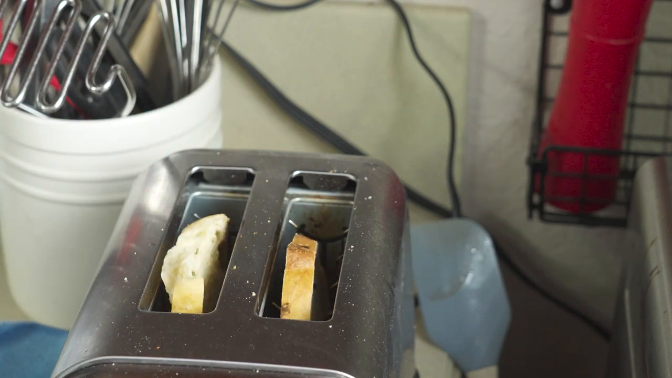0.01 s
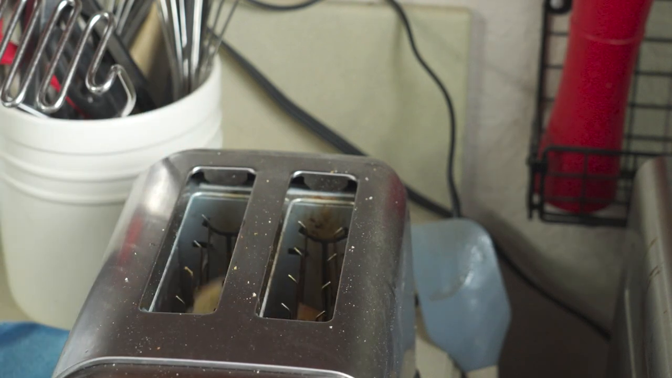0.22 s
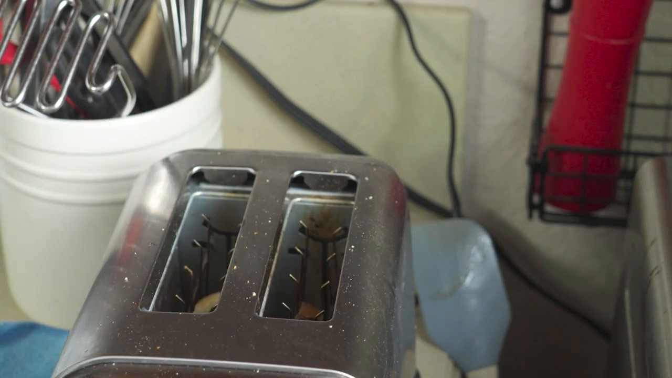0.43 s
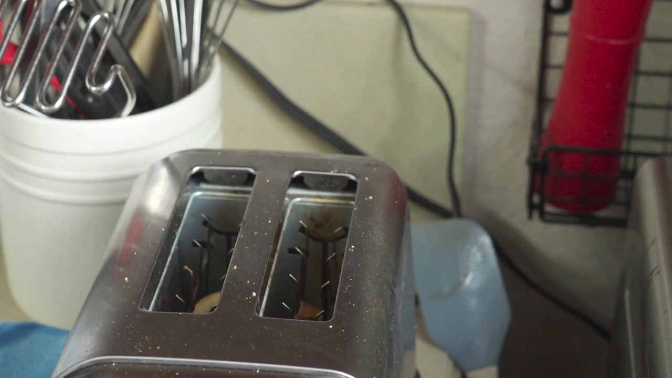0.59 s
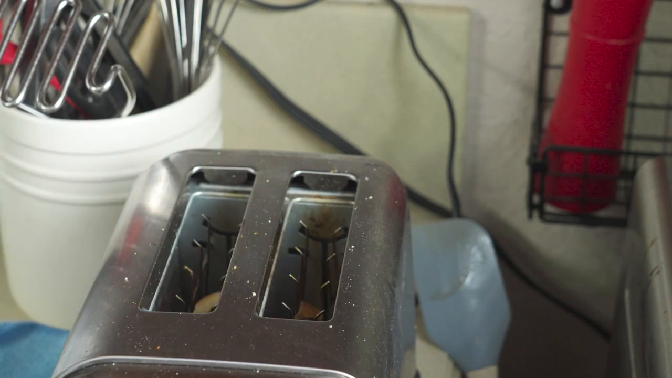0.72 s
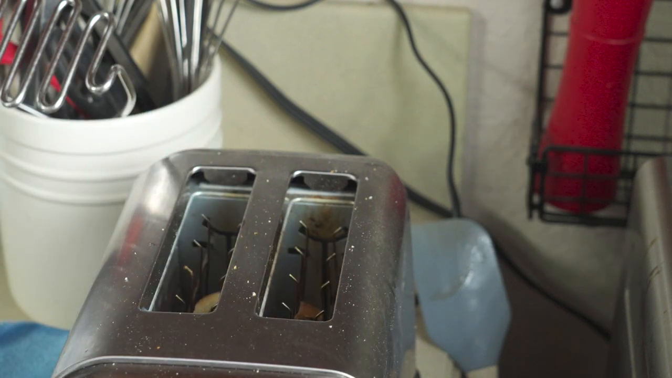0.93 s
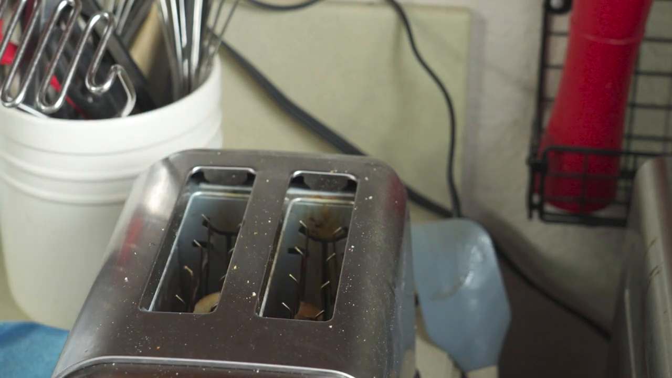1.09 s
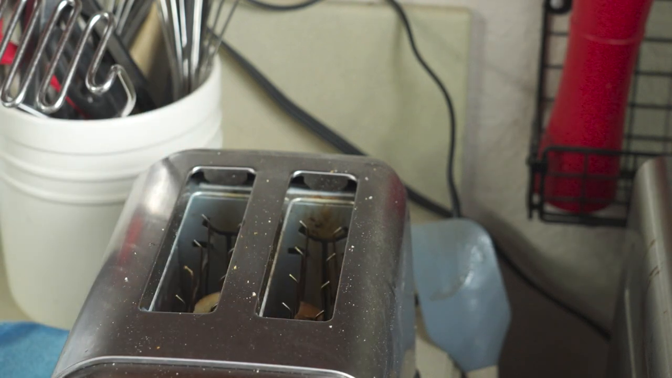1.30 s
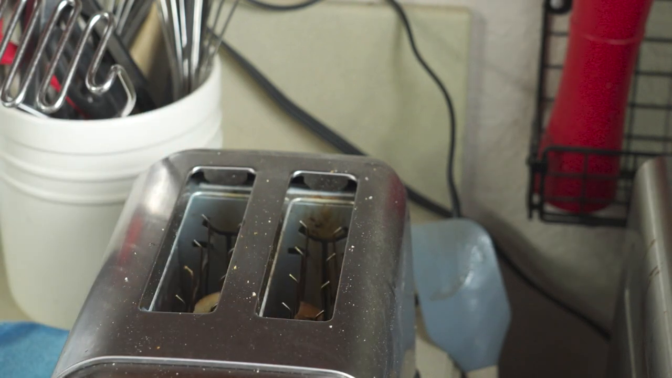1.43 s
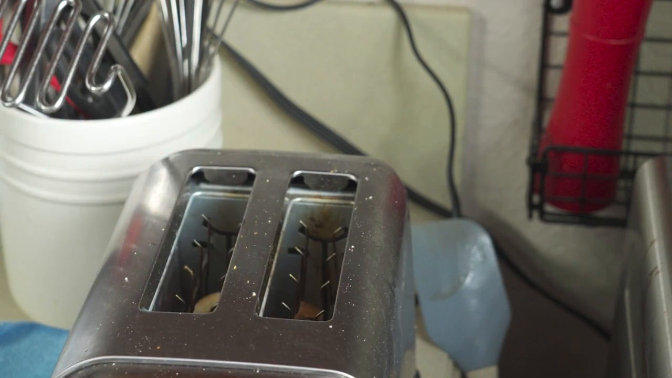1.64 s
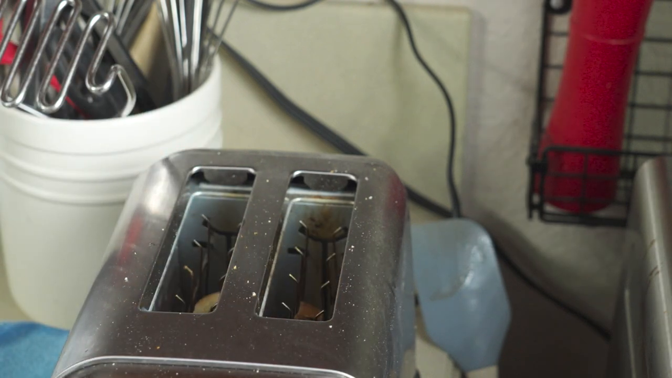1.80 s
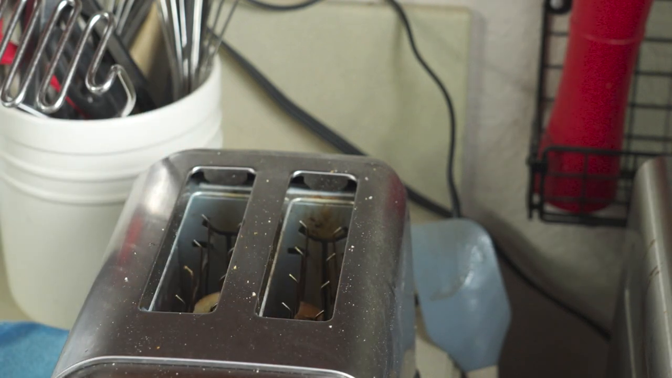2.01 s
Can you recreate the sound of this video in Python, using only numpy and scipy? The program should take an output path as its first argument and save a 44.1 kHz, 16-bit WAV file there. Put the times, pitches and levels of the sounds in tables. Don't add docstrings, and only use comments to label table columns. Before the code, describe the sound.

Toaster lever pushed down: quick scrape, loud metal clunk, brief rattle, then soft knocks and faint ticking

```python
import sys
import numpy as np
from scipy import signal
from scipy.fft import rfft, irfft
from scipy.io import wavfile

SR = 44100
rng = np.random.default_rng(int(sys.argv[2]) if len(sys.argv) > 2 else 0)


def gain_from_db(level_db):
    decades = np.asarray(level_db, float) / 20
    return 10 ** decades


def master_out(mix):
    frames = np.transpose(np.atleast_2d(mix))
    ceiling = np.clip(frames, -1, 1)
    pcm = np.round(ceiling * 32767).astype(np.int16)
    wavfile.write(sys.argv[1], SR, pcm)


N = 90405


def rms_one(x):
    return x / np.sqrt(np.mean(x ** 2) + 1e-30)


def at_hz(points, hz):
    table_hz, value = np.transpose(points)
    return np.interp(np.log(hz), np.log(table_hz), value)


def highpass(x, order, hz):
    return signal.sosfilt(signal.butter(order, hz, "high", fs=SR, output="sos"), x)


def colour(x, spectrum, humps=()):
    size = 16384
    hz = np.maximum(np.arange(size // 2 + 1) * SR / size, 1)
    db = at_hz(spectrum, hz)
    for centre_hz, width_hz, hump_db in humps:
        db = db + hump_db * np.exp(-((hz - centre_hz) / width_hz * 2) ** 2)
    cepstrum = irfft(np.log(gain_from_db(db)))
    cepstrum[1:size // 2] *= 2
    cepstrum[size // 2 + 1:] = 0
    h = irfft(np.exp(rfft(cepstrum)))
    return signal.fftconvolve(x, h / np.sqrt(np.sum(h ** 2)))[:len(x)]


def ring(clicks, hz, t60_s):
    r = gain_from_db(-60 / (max(t60_s, .002) * SR))
    w = 2 * np.pi * hz / SR
    return signal.lfilter([0, np.sin(w)], [1, -2 * r * np.cos(w), r * r], clicks + 1e-18)


def ring_noise(drive, modes):
    out = np.zeros(N)
    for hz, level_db, t60_s in modes:
        out += gain_from_db(level_db) * ring(drive * rng.standard_normal(N), hz, t60_s)
    return out


def shorten(modes, share):
    return [(hz, level_db, t60_s * share) for hz, level_db, t60_s in modes]


def strike(start_s, db, modes, dull_hz, spread_db):
    out = np.zeros(N)
    luck = rng.normal(0, 1, (len(start_s), len(modes)))
    for k, (hz, level_db, t60_s) in enumerate(modes):
        force = gain_from_db(db + level_db + spread_db * luck[:, k]) / (1 + (hz / dull_hz) ** 2)
        clicks = np.zeros(N)
        clicks[(start_s * SR).astype(int)] = -force
        out += ring(clicks, hz, t60_s)
    return out


def grains(per_s, spread_db):
    size = gain_from_db(spread_db * np.minimum(rng.exponential(1, N), 4))
    return size * rng.choice([-1, 1], N) * (rng.random(N) < per_s / SR)


# hz, db_per_hz
HISS = [(300, -4), (700, -4.5), (2200, -4.5), (5400, -3.5), (7900, -7), (9000, -14.5), (12000, -11.5),
        (15700, -14)]
# hz, db_per_hz
RUMBLE = [(3, -1.5), (12, -10), (25, -39), (60, -25.5), (150, -35.5), (300, -38), (600, -61)]
# hz, width_hz, level_db
HUMPS = [(3380, 1600, 2.5), (5500, 1100, 2), (7780, 1730, 3.5), (6500, 440, -1.5), (10770, 1060, -8),
         (496, 16, 10.5), (138.8, 31, 18.5)]
HISS_DB, RUMBLE_DB = -59, -67


def floor():
    white = rng.standard_normal((2, N + SR))
    hiss = colour(white[0], [(25, -35)] + list(HISS), HUMPS[:6])[SR:]
    rumble = colour(white[1], RUMBLE, HUMPS[6:])[SR:]
    return gain_from_db(HISS_DB) * rms_one(hiss) + gain_from_db(RUMBLE_DB) * rms_one(rumble)


# start_s, level_db, pitch_hz, t60_s
THUMPS = [(0.0355, -45, 158, 0.1), (0.262, -36.5, 82.6, 0.34), (.246, -30.5, 150.2, 0.16),
          (.251, -31.5, 223, 0.35), (0.69, -67, 57, 0.49), (1.048, -63, 66, 0.18),
          (1.179, -59.5, 61.2, 0.33), (1.637, -52, 76, 0.084), (1.689, -59, 81, 0.15)]
# start_s, level_db, t60_s
SHUDDERS = [
    (-.01, -52, 0.9),
    (0.129, -62.5, 1),
    (.250, -31.5, 0.51),
    (.46, -57.5, 0.99),
]
# hz, db_per_hz
SHUDDER_COLOUR = [(25, -23), (60, -0.5), (120, 0), (280, -5), (500, -3.5), (900, -8), (2000, -10.5),
                  (5000, -35.5)]
COUNTER_LOW_HZ = 47.6


def counter():
    t, out = np.arange(N) / SR, np.zeros(N)
    for start_s, level_db, pitch_hz, t60_s in THUMPS:
        age = np.maximum(t - start_s, 0)
        swell = 1 - np.exp(-age / 0.0083)
        out += gain_from_db(level_db - 60 * age / t60_s) * swell * np.sin(2 * np.pi * pitch_hz * age)
    shudder = colour(rng.standard_normal(N + SR), SHUDDER_COLOUR)[SR:]
    for start_s, level_db, t60_s in SHUDDERS:
        age = np.maximum(t - start_s, 0)
        out += gain_from_db(level_db - 60 * age / t60_s) * (1 - np.exp(-age / 0.0023)) * shudder
    return highpass(out, 2, COUNTER_LOW_HZ)


# mid_s, half_length_s, level_db, fold_start_hz, fold_end_hz
RUSTLES = [(0.027, 0.055, -59, 3670, 3540), (0.164, 0.047, -61, 5500, 5500), (1.253, 0.05, -59, 1486, 1493),
           (1.42, 0.07, -59.5, 1388, 1267), (1.489, 0.033, -62.5, 1290, 918),
           (1.575, 0.081, -64.5, 5500, 5500), (2.011, 0.0039, -57.5, 3300, 2470)]
# hz, db_per_hz
RUSTLE_COLOUR = [(500, -3.5), (1200, -12), (3000, 4.5), (6000, 7), (9000, 1.5), (12000, -3.5), (15500, -2)]
FOLD_DB, FOLD_WIDTH_HZ = -7, 280


def sleeve():
    t, out = np.arange(N) / SR, np.zeros(N)
    cloth = colour(rms_one(grains(15000, spread_db=1.5)), RUSTLE_COLOUR)
    narrow = signal.butter(2, FOLD_WIDTH_HZ / 2, fs=SR, output="sos")
    wobble = signal.sosfilt(narrow, rng.standard_normal((2, N)))
    for mid_s, half_s, level_db, start_hz, end_hz in RUSTLES:
        fold_hz = np.interp(t, [mid_s - half_s, mid_s + half_s], [start_hz, end_hz])
        phase = 2 * np.pi * np.cumsum(fold_hz) / SR
        fold = rms_one(wobble[0] * np.sin(phase) + wobble[1] * np.cos(phase))
        swell = np.exp(-((t - mid_s) / half_s) ** 2)
        out += gain_from_db(level_db) * swell * (cloth + gain_from_db(FOLD_DB) * fold)
    return out


# start_s, peak_db, pitch_hz, t60_s
METAL_RINGS = [(.024, -46, 2730, 0.015), (.001, -46, 3600, 0.013), (.0285, -44, 3660, 0.014),
               (.144, -46.5, 7500, 0.022), (.181, -50, 2340, 0.032), (.2285, -37, 503, 0.0068),
               (.4605, -43, 5780, 0.022), (.459, -39.5, 1410, .015), (.4635, -37.5, 440, 0.018),
               (.4642, -43.5, 533, 0.035), (0.2522, -16, 2300, 0.0045), (.2585, -29, 2740, .03),
               (.2665, -18, 593, 0.035), (.2677, -21, 5500, 0.0077), (.272, -30.5, 797, 0.11),
               (.277, -30, 847, 0.082), (.492, -46.5, 488, 0.067), (.533, -48.5, 501, 0.1),
               (.634, -53, 5500, .02), (.6563, -44, 7500, 0.0071), (1.866, -54, 1584, 0.048),
               (1.868, -60, 1320, .04), (2.0068, -47, 3100, 0.0081)]


def metal_rings():
    out = np.zeros(N)
    for start_s, peak_db, pitch_hz, t60_s in METAL_RINGS:
        out += strike(np.array([start_s]), peak_db, [(pitch_hz, 0, t60_s)], 30000, 0)
    return out


# start_s, peak_db
TICKS = [(.0021, -43), (.0351, -45), (.137, -45), (.1475, -43), (.1569, -44), (.182, -45), (.6369, -47),
         (.6563, -39), (.6595, -45), (.6637, -47), (.6901, -41), (.7666, -45), (.8974, -46), (.9133, -42),
         (.9268, -42), (.9554, -45), (.9992, -45), (1.2268, -45), (1.3889, -46), (1.4796, -46),
         (1.5742, -44), (1.6411, -45), (1.7167, -43), (1.8083, -47), (1.8465, -43), (1.8796, -43),
         (1.9022, -46), (1.9358, -45), (2.0068, -36), (2.036, -46), (2.0451, -46)]
# hz, level_db, t60_s
WIRES = [(1630, -14.5, 0.024), (3390, -3, 0.0097), (4650, -1.5, 0.0059), (5480, 1, 0.0084),
         (7500, 1, 0.0062)]
# hz, db_per_hz
SNAP_COLOUR = [(800, -15), (2000, -3), (3200, 3), (7800, -3), (10000, -16), (15700, -11)]
SNAP_DB, TICK_DB = -5, -9.5
TICK_RING = .3
CRACKLE_PER_S, CRACKLE_SPREAD_DB, CRACKLE_DB = 470, 1.0, -65.5


def wires():
    start_s, peak_db = np.transpose(TICKS)
    crackle = ring_noise(grains(CRACKLE_PER_S, CRACKLE_SPREAD_DB), WIRES)
    snap = np.zeros(N)
    snap[(start_s * SR).astype(int)] = -gain_from_db(peak_db + SNAP_DB)
    ticks = strike(start_s, peak_db + TICK_DB, shorten(WIRES, TICK_RING), 17000, 0.76)
    return ticks + colour(snap, SNAP_COLOUR) + gain_from_db(CRACKLE_DB) * rms_one(crackle)


# hz, level_db, t60_s
CASE = [(3027, -9.5, 0.099), (420, -7, 0.043), (576, -2.5, .09), (653.5, -6, .1), (517, -6, 0.017),
        (910, -13, 0.13), (1309, -4.5, 0.15), (1630, -5.5, .1), (1935, -8, 0.03), (2340, -6.5, .06),
        (2280, -7.5, 0.047), (2790, 1, .05), (3100, -14, .06), (3600, -5, 0.087)]
# hz, level_db, t60_s
RACKS = [(1530, -18, 0.14), (2210, -21, 0.02), (4270, -33, 0.051), (5140, -8, 0.014), (5570, -2, 0.071),
         (7300, -2, 0.0091), (9100, -12, 0.008), (12400, -6, .02), (14500, -5, .01)]
# time_s, level_db
SLIDE = [(0.227, -53), (0.2335, -41.5), (0.2386, -30), (0.242, -24.5), (0.245, -26), (.2505, -29),
         (0.26, -24.5), (0.301, -36.5), (.38, -56)]
# hz, db_per_hz
SLIDE_COLOUR = [(200, -32), (479, 4), (728, -22), (974, 0.5), (1430, -17), (2500, 3), (6000, -9),
                (15500, -26.5)]
SLIDE_PER_S = 12000
SLIDE_RING = .15


def slide():
    level = gain_from_db(np.interp(np.arange(N) / SR, *np.transpose(SLIDE), left=-120, right=-120))
    grit = rms_one(grains(SLIDE_PER_S, spread_db=-1.0))
    damped = shorten(CASE[6:] + RACKS, SLIDE_RING)
    energy = sum(gain_from_db(level_db) ** 2 * t60_s for _, level_db, t60_s in damped)
    norm = np.sqrt(energy * SR / (4 * np.log(1000)))
    return 0.76 * colour(level * grit, SLIDE_COLOUR) + .5 * ring_noise(level, damped) / norm


# hz, db_per_hz
CRACK_COLOUR = [(59, -52), (100, -17.5), (530, 0.5), (1590, -9.5), (2930, -5), (5750, -16.5), (6530, -17.5),
                (7730, -14), (15500, -43)]
# hz, width_hz, level_db
CRACK_DIPS = [(848, 147, -8), (1180, 70, -10)]
RING_DB, STRIKE_SPREAD_DB, CRACK_S = -15.5, 3.5, 0.0039
CONTACT_DB = 6.5


def blows(contacts, modes, crack_db):
    start_s, peak_db, dull_hz = np.transpose(contacts)
    age = np.arange(N) / SR - start_s[:, None]
    height = gain_from_db(peak_db + crack_db) * dull_hz / dull_hz.max()
    burst = (height[:, None] * (age >= 0) * np.exp(-np.abs(age) / CRACK_S)).sum(0)
    grit = rng.standard_normal(N)
    grit[np.ceil(start_s * SR).astype(int)] = -gain_from_db(CONTACT_DB)
    crack = colour(burst * grit, CRACK_COLOUR, CRACK_DIPS) / 2
    return strike(start_s, peak_db + RING_DB, modes, dull_hz, STRIKE_SPREAD_DB) + crack


# start_s, peak_db, dullness_hz
SLAM = [(.2516, -6, 6140), (.2527, -14, 5970), (.2542, -15, 2500), (.2562, -14.5, 2000), (.2585, -16, 5000),
        (.2615, -23, 5000), (.2655, -17.5, 6000), (.2680, -12, 2480), (.2788, -22, 3000),
        (.2848, -21.5, 4030), (.294, -23.5, 3000), (.3085, -35, 3000), (.317, -30, 3000),
        (.3235, -34, 1500), (.3315, -32, 2500), (.341, -29.5, 3000), (.3695, -45, 3000), (.376, -34, 1500),
        (.395, -39, 3000), (.412, -42, 3000)]


def slam():
    return blows(SLAM, CASE + RACKS, crack_db=-3)


# start_s, peak_db, dullness_hz
KNOCKS = [(.4565, -40, 8940), (.4595, -35.5, 7100), (.4640, -37.5, 1000), (.473, -25.5, 1800),
          (.480, -30, 2500), (.508, -32, 1190), (.538, -32, 714)]
# hz, level_db, t60_s
LEVER = [(494, -17, 0.033), (756, -6, 0.046), (1300, 3, 0.012), (1800, 5.5, 0.015), (2750, -4, 0.022),
         (3360, -2, 0.013), (4520, -1, .012), (5780, 0, 0.027), (7650, -1, .012)]


def lever():
    return blows(KNOCKS, LEVER, crack_db=-2)


# hz, t60_s
ROOM_T60 = [(60, 0.49), (250, 0.42), (700, 0.31), (1500, 0.2), (3000, 0.43), (6000, 0.33), (12000, 0.18)]
# hz, level_db
ROOM_COLOUR = [(60, -2), (250, 5), (550, -5), (1500, 5), (3000, -5), (6000, 1), (12000, 2)]
ROOM_DB, ROOM_RISE_S = -5.5, 0.013


def kitchen(x):
    t = np.arange(SR) / SR
    edges_hz = 45 * 2 ** np.arange(0, 9, .5)
    white = rng.standard_normal((2, SR))
    tail = np.zeros(SR)
    for k, (low_hz, high_hz) in enumerate(zip(edges_hz, edges_hz[1:])):
        mid_hz = np.sqrt(low_hz * high_hz)
        half_octave = signal.butter(2, [low_hz, high_hz], "band", fs=SR, output="sos")
        band = signal.sosfilt(half_octave, white[k % 2])
        t60_s = at_hz(ROOM_T60, mid_hz)
        decay = gain_from_db(at_hz(ROOM_COLOUR, mid_hz) - 60 * t / t60_s)
        tail += band * decay * np.sqrt(2 * np.log(1000) / t60_s / SR)
    swell = 1 - np.exp(-t / ROOM_RISE_S)
    return gain_from_db(ROOM_DB) * signal.fftconvolve(x, tail * swell)[:N]


RADIATES_HZ = 382


def scene():
    metal = slam() + lever() + metal_rings() + slide() + wires()
    toaster = highpass(metal, 4, RADIATES_HZ)
    return (toaster + kitchen(toaster) + counter() + sleeve() + floor())[None]


def roll_off(x):
    return signal.sosfilt(signal.butter(12, 15940, fs=SR, output="sos"), x)


def record(dry):
    lowpass = signal.ellip(12, .2, 70, 15720, fs=SR, output="sos")
    mix = signal.sosfilt(lowpass, dry)
    return roll_off(mix)


dry = scene()
out = record(dry)
master_out(out)
```